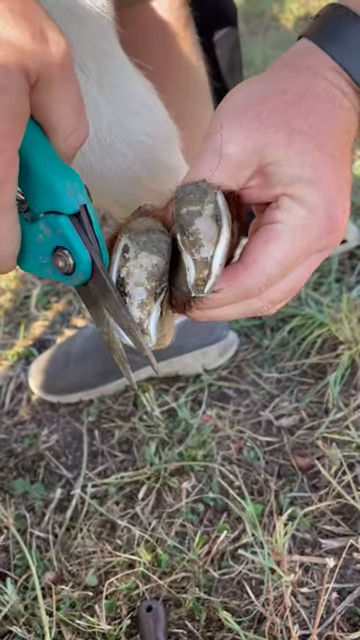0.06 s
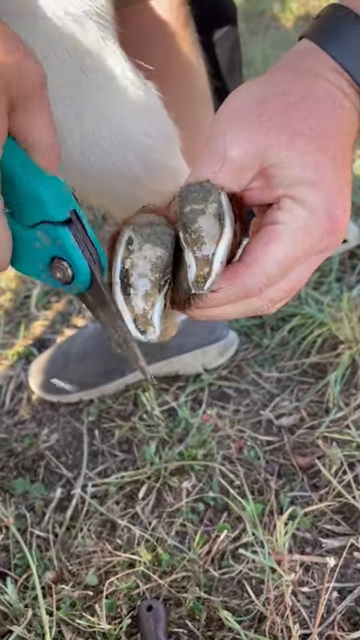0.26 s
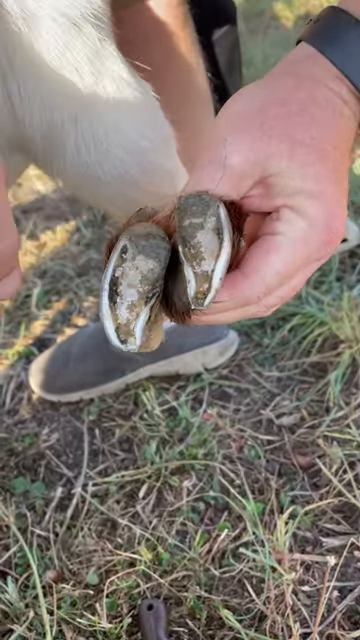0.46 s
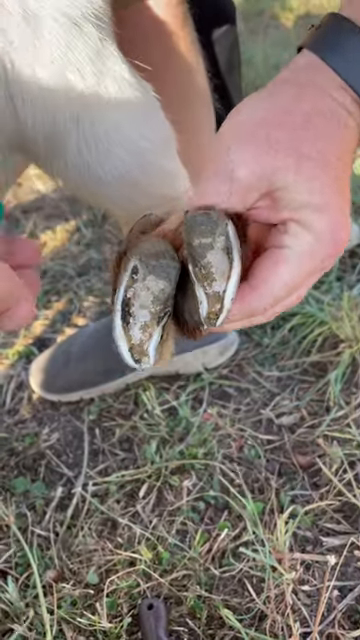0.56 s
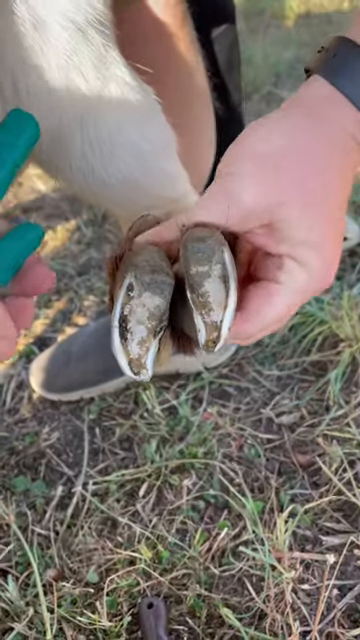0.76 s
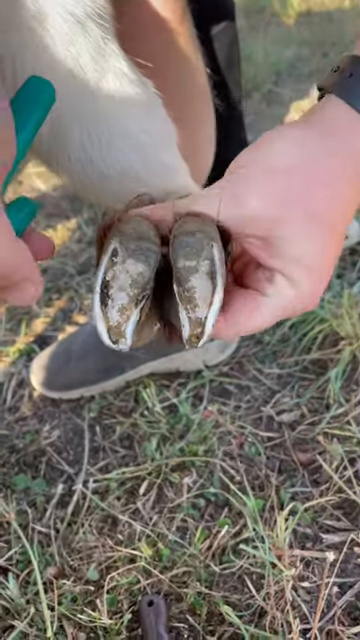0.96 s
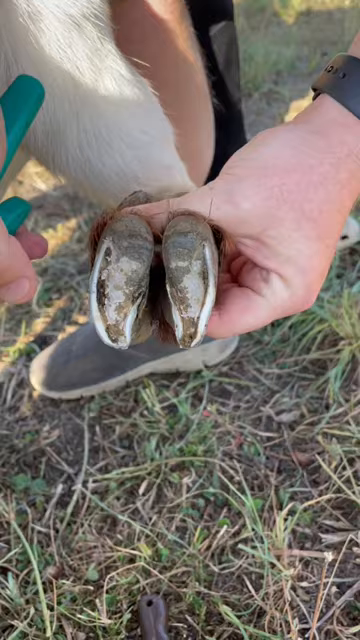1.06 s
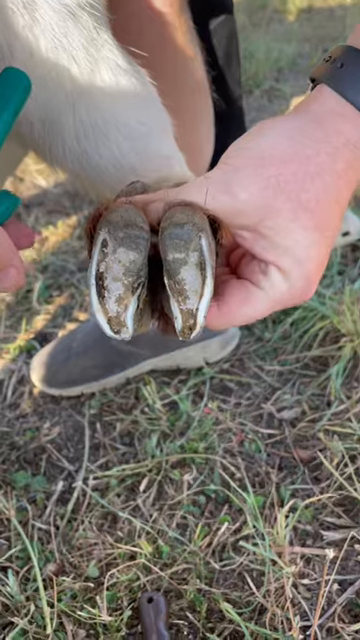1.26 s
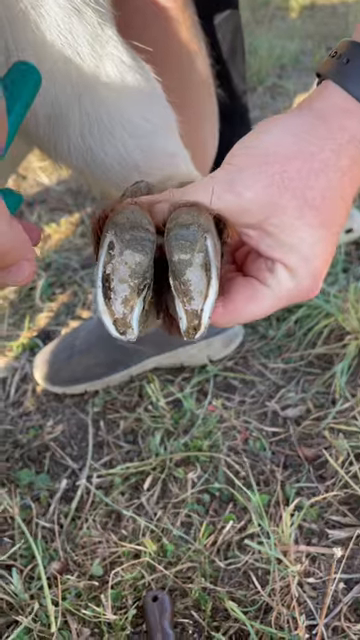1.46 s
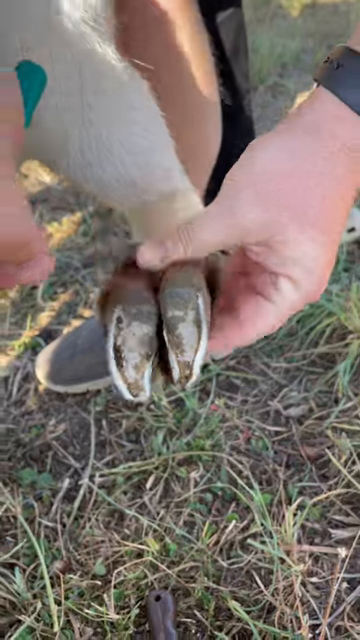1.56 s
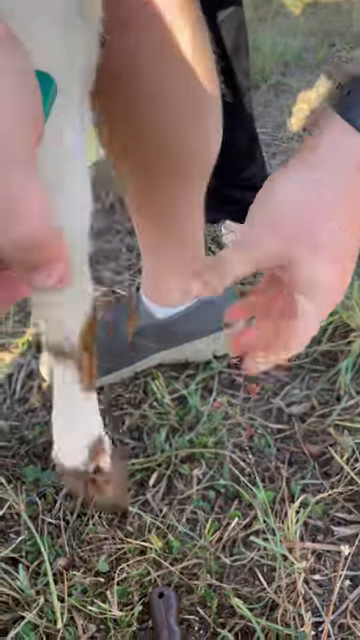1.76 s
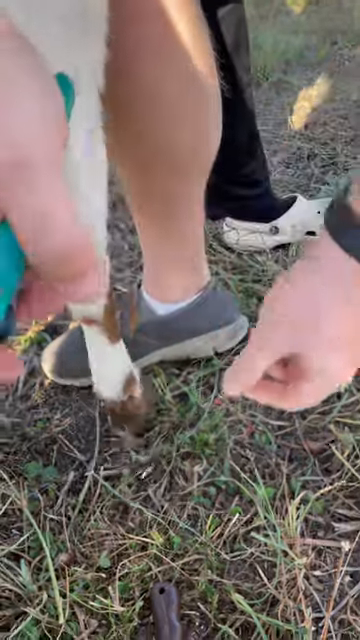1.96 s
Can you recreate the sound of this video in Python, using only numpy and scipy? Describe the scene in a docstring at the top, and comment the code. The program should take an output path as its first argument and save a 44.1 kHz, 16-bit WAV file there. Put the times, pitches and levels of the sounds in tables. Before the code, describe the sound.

Hand shears snip a goat's hoof: at about 0.2 s horn crackles and snaps loudly, with a short dull thud. The blades click open at 0.38 and 0.45 s, scraping lightly, with a faint spring ring. Then quiet low handling rumble and soft bumps, clustering around 1.55 s, and hair and grass rustling from 1.75 s to the end. Faint crickets chirp throughout in dry, close outdoor air.

```python
"""Hand shears cut a goat's hoof rim: horn crackles (coloured impulse clusters) and snaps (dying modes),
blades scrape and click open (impulse clusters), the spring rings faintly (dying sines).
Soft handling bumps (damped sagging thuds) lie over a noise rumble; hair, skin and grass rustle
(clumped noise), more as the leg is let go. Crickets chirp (falling whistles with a diffuse tail)
over an outdoor hush (coloured noise)."""
import sys
import numpy as np
from scipy import signal
from scipy.fft import rfft, irfft
from scipy.io import wavfile
from scipy.ndimage import uniform_filter1d

SR = 44100
rng = np.random.default_rng(int(sys.argv[2]) if len(sys.argv) > 2 else 0)


def log_audio(samples):
    """Write samples as a 16-bit WAV file to the path given in sys.argv[1]."""
    # one column per channel
    frames = np.atleast_2d(samples).T
    # limit to full scale, then quantise
    limited = np.clip(frames, -1, 1)
    pcm = np.round(limited * 32767).astype(np.int16)
    wavfile.write(sys.argv[1], SR, pcm)


N = 88200
HZ, T = np.fft.rfftfreq(N, 1 / SR), np.arange(N) / SR
CONTACT_HOLD_S = 0.00036  # steel contacts and touches, before decay

# colour of the low hush and of dragging skin: freq_hz, gain_db
HUSH_COLOUR = [(100, -3), (300, 3), (450, -4.5), (700, -21), (1400, -24.5), (4000, -42.5), (16000, -60.5)]
# colour of rubbing hair, skin and grass, and of faint bright ticks: freq_hz, gain_db
RUB_COLOUR = [(200, -8), (1000, 0), (1900, -2.5), (2700, -0.5), (4800, 3), (8500, 0.5), (11000, -4),
              (13300, 8.5), (14300, -1), (15600, -0.5), (16400, -29)]
# colour of moving hair: freq_hz, gain_db
HAIR_COLOUR = [(1000, -24.5), (10500, -11.5), (13000, 5), (15300, 2.5), (16300, -23.5)]


def amp(db):
    """Decibels to gain."""
    return 10 ** (np.asarray(db) / 20)


def unit(x):
    """Scales to rms 1."""
    return x / np.sqrt(np.mean(x ** 2) + 1e-20)


def shape(points):
    """Gain per frequency, interpolated over log frequency from (freq_hz, gain_db)."""
    hz, db = np.transpose(points)
    return amp(np.interp(np.log(HZ + 1), np.log(hz), db))


def level(points):
    """Gain over time from (time_s, level_db)."""
    return amp(np.interp(T, *np.transpose(points)))


def colour(x, points):
    """Causal minimum-phase filter with the given spectrum and unit power gain."""
    log_gain = np.log(unit(shape(points)))
    circle = np.concatenate([log_gain, log_gain[-2:0:-1]])
    response = np.exp(signal.hilbert(circle).conj()[:len(HZ)])
    return irfft(rfft(x) * response, N)


def smooth_noise(count, size):
    """Slow random curve, rms 1: white noise averaged over size samples."""
    return unit(uniform_filter1d(rng.standard_normal(count), size=size))


def add(mix, s, sound):
    """Mixes a sound in at time s."""
    part = mix[max(round(s * SR), 0):][:len(sound)]
    part += sound[:len(part)]


def near(x):
    """A close source reaches the two microphones with slightly different phase and level."""
    # left-to-right level tilt: freq_hz, left_gain_db
    tilt = [(300, 0), (700, 3), (1300, 2.5), (2400, -1.5), (4400, 1), (8000, 0), (15000, .3)]
    # phase lead in the left microphone: freq_hz, lead_rad
    lead = [(0, 0), (2000, .05), (3700, .5), (4800, 1.15), (5700, .3), (7200, 1.5), (10000, 3.14),
            (12700, 4.7), (15200, 6.1)]
    half = np.sqrt(shape(tilt)) * np.exp(.5j * np.interp(HZ, *np.transpose(lead)))
    return irfft(rfft(x) * np.array([half, 1 / half]), N)


def bursts(rows, hold_s):
    """Each contact is a dense cluster of tiny impulses, even in colour, that dies quickly."""
    out, t = np.zeros(N), T[:N // 8]
    for start_s, db, decay_s in rows:
        envelope = np.exp(-np.maximum(t - hold_s, 0) / decay_s)
        cluster = rfft(envelope * rng.standard_normal(len(t)))
        flat = irfft(cluster / np.abs(cluster), len(t))
        even = flat * np.sqrt(envelope)
        add(out, start_s, amp(db) * even * np.linalg.norm(envelope) / np.linalg.norm(even))
    return out


def mode(hz, db, t60_s):
    """One exponentially dying sine vibration."""
    return amp(db - 60 * T / t60_s) * np.sin(2 * np.pi * hz * T)


def patchy(x, swing_db):
    """Lets each band surge and ebb on its own."""
    z = signal.stft(x, nperseg=256)[2]
    field = uniform_filter1d(rng.standard_normal(z.shape[-2:]), size=7, axis=0)
    field = unit(uniform_filter1d(field, size=9, axis=1))
    return signal.istft(z * amp(swing_db * field), nperseg=256)[1][..., :N]


def air():
    """Distant outdoor hush: noise partly shared by the two microphones."""
    # open air with a far insect chorus: freq_hz, gain_db
    air_colour = [(150, 12.5), (400, 6.5), (650, 5), (1200, 6.5), (1900, -2), (3300, -13.5), (5800, -18.5),
                  (7000, 0), (7800, 4), (8500, -7), (11000, -31.5), (14000, -10.5), (15700, -20.5),
                  (16500, -39.5)]
    # share both microphones hear alike, capped at 0 dB: freq_hz, share_db
    shared_db = [(300, 0.5), (700, -16.5), (7000, -10), (10000, 11), (13000, -8.5)]
    air_db = -64
    shared = np.clip(shape(shared_db), 0, 1)
    common = near(irfft(rfft(rng.standard_normal(N)) * shared, N))
    apart = irfft(rfft(rng.standard_normal((2, N))) * np.sqrt(1 - shared ** 2), N)
    return amp(air_db) * colour(common + apart, air_colour)


def low_hush():
    """Soft low noise, alike in both microphones, that swells and ebbs."""
    # hush level: time_s, level_db
    hush_level = [(0, -61.5), (.3, -54.5), (.65, -54), (.95, -68), (1.2, -64.5), (1.45, -72), (1.8, -64)]
    return level(hush_level) * colour(rng.standard_normal(N), HUSH_COLOUR)


def crickets(waver_hz=50):
    """Each wing stroke is a short falling whistle, blurred by the field."""
    # phrases: start_s, end_s, period_s, pitch_hz, fall_hz, pulse_s, level_db, swell_db
    phrases = [ (.076, .19, .046, 4370, 400, .032, -66.5, 0), (.497, .61, .046, 4370, 400, .032, -66, 0),
               (.933, 1.05, .046, 4370, 400, .032, -68, 0), (1.398, 1.51, .045, 4350, 400, .032, -68, 0),
               (1.207, 1.32, .046, 5000, 400, .025, -79, 5), (1.553, 1.67, .046, 5030, 400, .025, -75, 0),
               (.033, .9, .0643, 7880, 180, .03, -64, 0), (1.0, 1.73, .0645, 7880, 150, .03, -64, 3),
               (1.10, 1.65, .0572, 8800, 220, .026, -67, 7), (.85, 1.045, .0228, 9150, 280, .014, -69.5, 4)]
    spread_db = 1.3  # rms, pulse to pulse
    field_db, field_t60_s = -11, .11
    out = np.zeros(N)
    for start_s, end_s, period_s, hz, fall_hz, pulse_s, db, swell_db in phrases:
        u = np.arange(0, 1, 1 / (pulse_s * SR))
        for s in np.arange(start_s, end_s, period_s):
            waver = smooth_noise(N // 16, 60)[:len(u)]
            turns = np.cumsum(hz + fall_hz * (.5 - u) + waver_hz * waver) / SR
            swell = swell_db * (s - start_s) / (end_s - start_s)
            pulse_db = db + spread_db * rng.standard_normal() + swell
            pulse = np.sin(np.pi * u) ** 2 * np.sin(2 * np.pi * turns)
            add(out, s - pulse_s / 2, amp(pulse_db) * pulse)
    tail = rng.standard_normal((2, N)) * amp(-60 * T / field_t60_s)
    tail /= np.linalg.norm(tail[0])
    return near(out) + amp(field_db) * signal.fftconvolve(out[None], tail)[:, :N]


def rumble():
    """Low handling noise with a lumpy level, alike in both microphones."""
    # rumble colour: freq_hz, gain_db
    rumble_colour = [(20, -29.5), (40, -1), (62, 9), (110, -1.5), (190, -5), (330, -22.5), (500, -36.5),
                     (900, -70)]
    # rumble level: time_s, level_db
    rumble_level = [(0, -50.5), (.15, -58), (.45, -50.5), (.7, -48.5), (.9, -52), (1.2, -47.5),
                    (1.65, -46.5), (1.84, -49), (1.92, -57.5), (2, -44.5)]
    lumps = amp(2.2 * smooth_noise(N, 700))  # rms swing in dB
    noise = unit(lumps * rng.standard_normal(N))
    return level(rumble_level) * colour(noise, rumble_colour)


def bumps():
    """Heavily damped thuds whose pitch sags as the flesh gives way."""
    # dull bumps of hoof and hands: middle_s, level_db, pitch_hz, sag_cycles
    thuds = [(0.216, -13.5, 351, 4), (0.2223, -29.5, 216, 2.5), (0.3854, -32, 137, 1.56),
             (0.3999, -25, 168.4, 1.59), (0.683, -36, 126.7, 1.6), (0.7241, -39.5, 206, 2),
             (1.086, -42.5, 65, 2.58), (1.28, -37, 107.9, 1.21), (1.311, -36.5, 273.5, 1.66),
             (1.531, -25.5, 99.8, 1.54), (1.569, -34, 169.5, 3.7), (1.59, -35, 151, 1.7),
             (1.603, -31, 80.4, 5.3), (1.704, -32.5, 78.8, 4.6), (1.747, -26.5, 112.7, 1.22),
             (1.804, -39, 138.5, 5), (1.849, -35.5, 76.6, 2.5)]
    rise_cycles, fall_cycles = 0.92, 0.8
    out = np.zeros(N)
    for middle_s, db, hz, sag_cycles in thuds:
        stretch = np.maximum(1 + (T - middle_s) * hz / sag_cycles, 1e-6)
        cycles = sag_cycles * np.log(stretch)
        width = np.where(cycles < 0, rise_cycles, fall_cycles)
        out += amp(db) * np.exp(-.5 * (cycles / width) ** 2) * np.cos(2 * np.pi * cycles)
    return near(out)


def touches():
    """Brief ticks, swishes, scuffs, rasps and skin drags, as coloured impulse clusters."""
    # faint bright ticks: crumbs of horn at the cut, later grit and dry stalks:
    # start_s, level_db, decay_s
    ticks = [(.1972, -39, .0012), (.2402, -52, .0005), (.787, -60, .004), (.931, -56, .001),
             (1.7572, -44.5, .003), (1.7668, -46, .003), (1.896, -47, .001), (1.916, -46, .002)]
    # swish of hair: start_s, level_db, decay_s
    swishes = [(1.808, -41.5, 0.0075)]
    # scuffs against the hoof: start_s, level_db, decay_s
    scuffs = [(.01, -62.5, .11), (.06, -58.5, .079), (.341, -44.5, 0.0043)]
    # scuff colour: freq_hz, gain_db
    scuff_colour = [(200, 2.5), (600, 2), (950, 6), (1500, -17.5), (4000, -35.5), (16000, -51)]
    # rasps in the grass as the foot comes down: start_s, level_db, decay_s
    rasps = [(1.88, -55, 0.017), (1.93, -56.5, .014)]
    # rasp colour: freq_hz, gain_db
    rasp_colour = [(1700, -28), (2500, 0), (2850, -5), (4000, -22)]
    # rough skin drags as the grip shifts: start_s, level_db, decay_s
    drags = [(.675, -51, 0.015), (1.524, -47.5, 0.01), (1.551, -52.5, 0.013), (1.581, -51.5, 0.0034),
             (1.602, -50.5, .005), (1.735, -42, 0.0024)]
    kinds = [(ticks, RUB_COLOUR), (swishes, HAIR_COLOUR), (scuffs, scuff_colour),
             (rasps, rasp_colour), (drags, HUSH_COLOUR)]
    return sum(colour(bursts(rows, CONTACT_HOLD_S), tone) for rows, tone in kinds)


def sliding_hand():
    """The hand slides on the grip: coloured noise."""
    # slide level: time_s, level_db
    slide_level = [(.38, -74.5), (.48, -65.5), (.68, -73), (.82, -73.5), (.9, -81.5), (1.1, -87.5)]
    # slide colour: freq_hz, gain_db
    slide_colour = [(300, -6), (1500, 0), (2300, 4.5), (3500, -4.5), (5500, 0.5), (8000, -12.5),
                    (16000, -8.5)]
    return colour(rng.standard_normal(N) * level(slide_level), slide_colour)


def rustle(patchy_db=0.5):
    """Clumped grains of rubbing hair, skin and grass, partly scattered by the ground."""
    # rubbing level: time_s, level_db
    rub_level = [(0, -75), (.8, -69.5), (1.1, -77.5), (1.48, -78.5), (1.56, -62.5), (1.65, -75),
                 (1.735, -64.5), (1.765, -57.5), (1.83, -54), (1.91, -55.5), (2, -52.5)]
    # fizz of hair slipping through the hand: time_s, level_db
    fizz_level = [(1.72, -83), (1.76, -52.5), (1.815, -60), (1.83, -82), (1.92, -56), (1.96, -62), (2, -43)]
    # share scattered by the ground: freq_hz, share_db
    scatter = [(300, 10), (1300, -7), (3000, 0.5), (7000, -47)]
    clumps = amp(2.6 * smooth_noise(N, 170))  # rms swing in dB
    # row 0 is the near sound; rows 1 and 2 are scattered left and right
    grains = unit(patchy(clumps * rng.standard_normal((3, N)), patchy_db))
    rub = colour(grains * level(rub_level), RUB_COLOUR)
    fizz = colour(clumps * rng.standard_normal(N) * level(fizz_level), HAIR_COLOUR)
    scattered = irfft(rfft(rub[1:]) * shape(scatter), N)
    return near(rub[0] + fizz + sliding_hand() + touches()) + scattered


def spring():
    """The spring rings on as dying sines."""
    # rings: start_s, pitch_hz, level_db, t60_s
    rings = [(.454, 2015, -36, .065), (.456, 2120, -64, 1.1), (.85, 2060, -68.5, .9)]
    out = np.zeros(N)
    for start_s, hz, db, t60_s in rings:
        add(out, start_s, mode(hz, db, t60_s))
    return out


def blades():
    """Steel clicks open; blades scrape along the horn and past each other."""
    # metal contacts as the shears open: start_s, level_db, decay_s
    clicks = [(.3839, -17.5, .00055), (.3858, -36, 0.0043), (.4535, -21.5, 0.00076), (.4556, -21.5, 0.0014)]
    # steel colour: freq_hz, gain_db
    steel_colour = [(200, -26), (900, -12), (1600, -20.5), (2200, 1), (3000, -14), (4200, -8.5), (5600, -3),
                    (9200, 3.5), (10300, -1), (11900, 9.5), (13500, 1.5), (15300, -4), (16500, -13)]
    # blade scrapes: start_s, level_db, decay_s
    scrapes = [(.2015, -38, .005), (.4255, -54, 0.0027), (.4304, -44.5, 0.0023), (.4337, -38.5, 0.0029),
               (.4455, -50, .006), (.459, -45.5, 0.017), (.4720, -46, 0.0062), (.4795, -49, .003)]
    # scrape colour: freq_hz, gain_db
    scrape_colour = [(500, -19.5), (1500, -2.5), (2500, -2.5), (3700, -1.5), (5500, 5.5), (7300, -4.5),
                     (12500, -2), (16000, -11.5)]
    out = colour(bursts(clicks, CONTACT_HOLD_S), steel_colour)
    return out + colour(bursts(scrapes, CONTACT_HOLD_S), scrape_colour)


def horn():
    """Fractures crackle in the horn; the snap excites modes of hoof and blades."""
    # fractures: start_s, level_db, decay_s
    cracks = [(.2053, -35.5, 0.0049), (.2080, -22.5, 0.0015), (.2090, -22, 0.00027),
              (.2105, -16.5, 0.00046), (.2117, -20.5, 0.00071), (.2127, -8, 0.0005), (.2136, -14, 0.0023),
              (.2158, -28.5, 0.0011)]
    # horn colour: freq_hz, gain_db
    horn_colour = [(100, -25), (580, -24.5), (780, -2), (1000, 4.5), (1280, 3), (1650, -12), (2400, 0),
                   (3200, -0.5), (5000, 0), (7200, 1.5), (8300, -1), (10700, 2.5), (13500, 3), (14200, -9),
                   (15400, -6.5), (16500, -21.5)]
    # modes of hoof and blades under the cut: pitch_hz, level_db
    cut_modes = [(828, -19), (1000, -24), (2382, -19.5), (2765, -27), (3735, -21), (4010, -29), (4564, -22),
                 (4958, -24.5), (5220, -22.5), (6327, -25), (7090, -26.5), (12160, -25.5), (13500, -28)]
    crack_hold_s, snap_s, cut_t60_s = 0.00024, .213, .017
    out = colour(bursts(cracks, crack_hold_s), horn_colour)
    add(out, snap_s, sum(mode(hz, db, cut_t60_s) for hz, db in cut_modes))
    return out


def shears():
    """The cut close by: horn, blades and spring."""
    return near(horn() + blades() + spring())


def scene():
    """All sources together."""
    return air() + low_hush() + crickets() + rumble() + bumps() + rustle() + shears()


def record(dry):
    """The recorder's band limit: linear-phase low-pass."""
    edge_hz = 16350
    lowpass = signal.firwin(301, edge_hz, window=("kaiser", 9), fs=SR)
    return signal.oaconvolve(dry, lowpass[None], "same")


dry = scene()
out = record(dry)
log_audio(out)
```